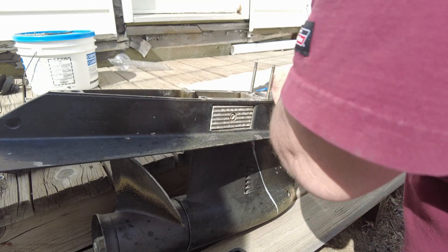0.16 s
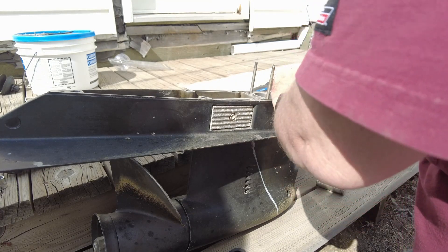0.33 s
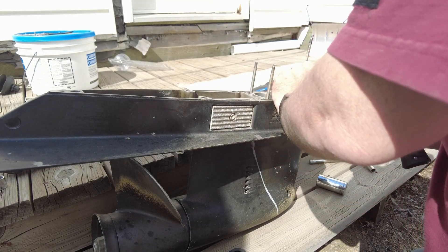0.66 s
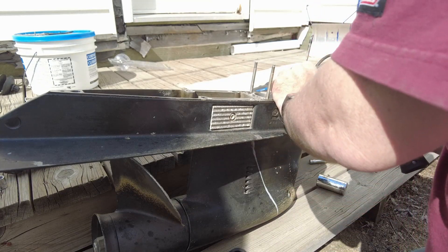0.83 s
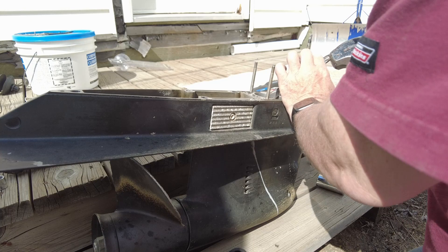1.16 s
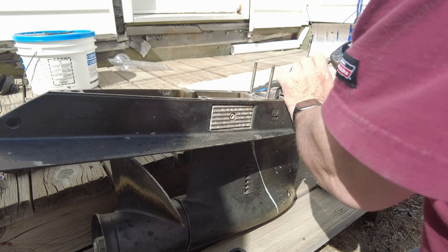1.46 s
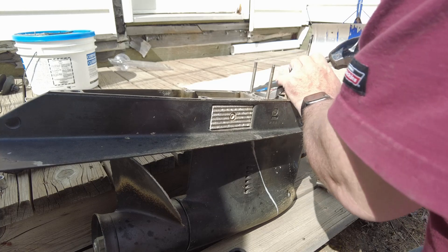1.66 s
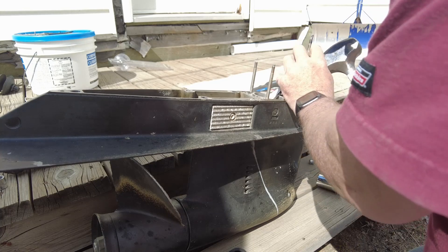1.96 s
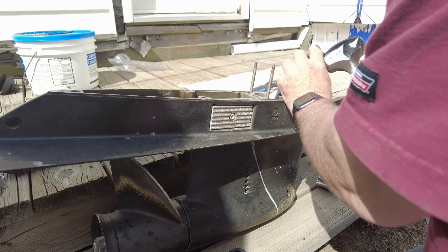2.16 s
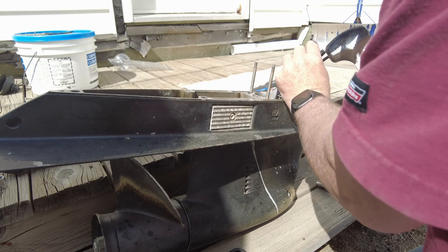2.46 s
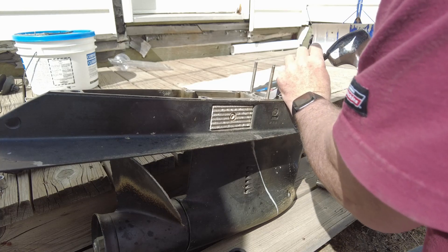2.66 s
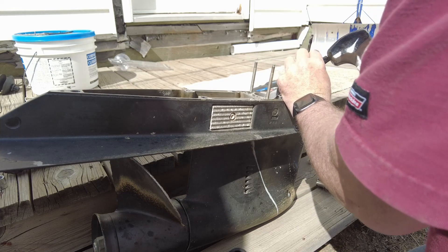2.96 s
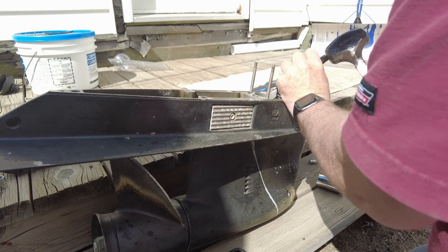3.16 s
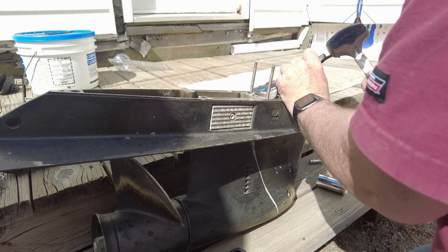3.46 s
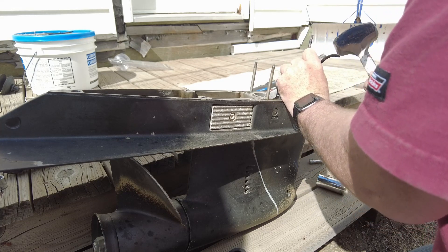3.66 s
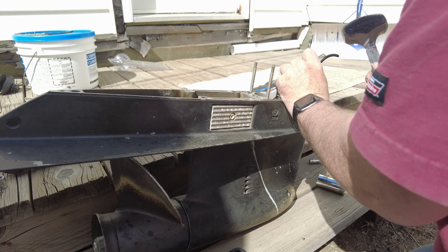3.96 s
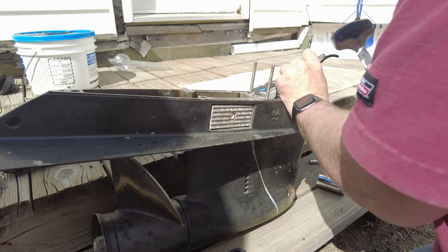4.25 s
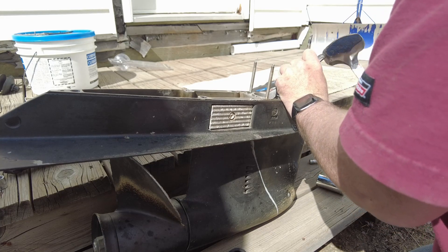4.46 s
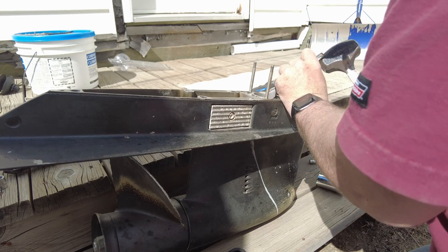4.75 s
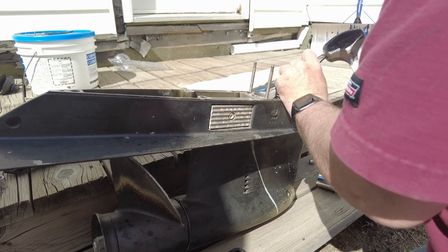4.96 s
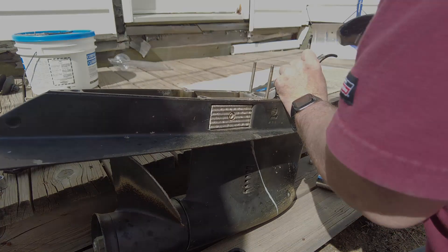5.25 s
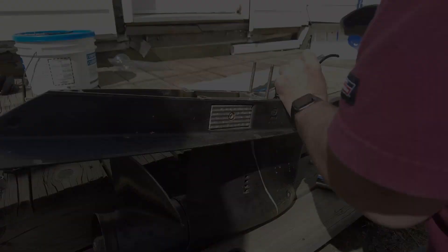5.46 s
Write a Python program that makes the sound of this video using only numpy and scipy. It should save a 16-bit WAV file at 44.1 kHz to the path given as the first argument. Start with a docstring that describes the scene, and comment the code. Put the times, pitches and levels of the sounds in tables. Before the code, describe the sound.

Close metallic hammering on a punch against a machine's metal housing, after quiet tool fumbling and wind buffeting, growing brighter and more ringing.

```python
"""Hammer and punch on a sheet-steel deck

Outdoors, a hammer drives a steel punch into a part of a machine deck, close to a mono camera microphone.
Blows are decaying modes of deck, punch and hammer plus decaying bands of noise, clipped by the recorder.
A loose piece rattles after the harder blows: short modes and a bright tick at each landing.
Around the first blows the tools are set with small taps and scrapes: clicks, mode clusters, gritty noise.
Behind lie wind rumble, a far motor's wavering drone and a distant hush, all of filtered or random signals."""
import sys
import numpy as np
from scipy import signal
from scipy.fft import rfft, irfft, next_fast_len
from scipy.io import wavfile
from scipy.ndimage import uniform_filter1d

SR = 44100
rng = np.random.default_rng(int(sys.argv[2]) if len(sys.argv) > 2 else 0)


def master(y):
    """Save y as 16-bit WAV."""
    cut = np.clip(np.atleast_2d(y).T, -1, 1)
    pcm = np.round(cut * 32767)  # scale
    wavfile.write(sys.argv[1], SR, pcm.astype(np.int16))


N = 246695

# modes of the deck's deep thud: pitch_hz, level_db, t60_s
THUD_MODES = [(160.4, -7, 0.076), (188, -11, 0.2), (268, -24.5, 0.31), (310.8, -16, 0.18),
              (364.5, -6.5, 0.17), (433.1, -5, 0.19), (455.1, -7, 0.17), (565, -14.5, 0.17),
              (740, -27, 0.06)]
# modes of the deck panel: pitch_hz, level_db, t60_s
PANEL_MODES = [(780, -14, .1), (1030, 0, .12), (1075, -6, .08), (1320, -11, .1), (1653, -3, .09),
               (1868, -18, .15), (2140, -15, .1), (2436, -15, .1)]
# clear high ring: pitch_hz, level_db, t60_s
HIGH_RING_MODES = [(1473, 0, .95), (2078, -19, .5)]


def undb(db):
    """Decibels to amplitude."""
    return 10 ** (np.asarray(db, float) / 20)


def unit(x):
    """Scale a signal to rms 1."""
    return x / np.sqrt(np.mean(x ** 2))


def add(out, s, sound):
    """Mix a short sound in at s seconds, cut at the end of the scene."""
    i = int(s * SR)
    out[i:i + len(sound)] += sound[:N - i]


def band(lo_hz, hi_hz, size=N, order=2):
    """Noise between two edges, rms 1."""
    edges_hz = [lo_hz, min(hi_hz, .45 * SR)]
    sos = signal.butter(order, edges_hz, "bandpass", fs=SR, output="sos")
    return unit(signal.sosfilt(sos, rng.standard_normal(size)))


def curve(rows, axis=1):
    """Amplitude over time from rows of start_s and a level column in dB, joined by straight lines in dB."""
    rows = np.asarray(rows)
    return undb(np.interp(np.arange(N) / SR, rows[:, 0], rows[:, axis]))


def walk(rate_hz):
    """Random values, rate_hz new ones a second, joined by straight slews; spread a little under 1."""
    k = int(SR / rate_hz)
    steps = np.repeat(rng.standard_normal(N // k + 1), k)
    return uniform_filter1d(steps, k)[:N]


def kicks(s, size):
    """Single-sample impulses at the given seconds."""
    x = np.zeros(N)
    x[(np.asarray(s) * SR).astype(int)] = size
    return x


def fade(x, t60_s):
    """Every kick starts an exponential decay."""
    return signal.lfilter([1], [1, -np.exp(-np.log(1000) / (t60_s * SR))], x)


def ring(modes, s, db, spread_db=7.0, detune=0.):
    """Strike decaying modes; every contact varies each mode's level at random, and detune its pitch."""
    chance = rng.standard_normal((len(s), len(modes), 2))
    out = np.zeros(N)
    for e in range(len(s)):
        for k, (hz, mode_db, t60_s) in enumerate(modes):
            t = np.arange(int(t60_s * SR)) / SR
            level_db = db[e] + mode_db + spread_db * chance[e, k, 0] - 60 * t / t60_s
            size = (-1) ** k * undb(level_db)  # neighbouring modes start in opposite directions
            pitch_hz = hz * (1 + detune * chance[e, k, 1])
            add(out, s[e], size * np.sin(2 * np.pi * pitch_hz * t))
    return out


def lumpy(x, peaks_db):
    """Give a noise the given uneven spectrum, rms 1."""
    size = next_fast_len(N)
    bins, knots = np.linspace(0, 1, size // 2 + 1), np.linspace(0, 1, len(peaks_db))
    gain = undb(np.interp(bins, knots, peaks_db))
    return unit(irfft(rfft(x, size) * gain, size)[:N])


def hush():
    """Distant outdoor noise in third-octave bands that waver a little, together and each alone."""
    # spectrum of the distance: pitch_hz, density_db (per Hz, relative)
    spectrum = [(60, -1), (90, 4), (140, -5.5), (220, -8.5), (450, -14.5), (1100, -17.5), (1700, -26.5),
                (2500, -26), (4000, -35), (8000, -38), (12500, -41.5), (15000, -56.5)]
    hz, db = np.transpose(spectrum)
    out, swell = 0, walk(0.34)
    for f in 63 * 2 ** np.arange(0, 8, 1 / 3):
        density_db = np.interp(np.log(f), np.log(hz), db) + 0.62 * swell + 1.0 * walk(9.6)
        # the square root of the pitch stands for the band's width
        out = out + undb(density_db) * np.sqrt(f) * band(f / 2 ** (1 / 6), f * 2 ** (1 / 6))
    return undb(-46.5) * unit(out)


def drone():
    """A far motor: a gliding tone whose two quadratures waver at random, which blurs its pitch."""
    # course of the motor: start_s, pitch_hz, level_db
    course = [(0.0, 135, -50.5), (.4, 136, -52.5), (1.1, 130.3, -44.5), (1.25, 129.6, -56.5),
              (1.4, 135.3, -45), (2.35, 133.8, -50.5), (2.5, 117.5, -40.5), (2.9, 104.3, -58),
              (3.6, 127.7, -50), (5.59, 130, -52)]
    s, hz, _ = np.transpose(course)
    turn = 2 * np.pi * np.cumsum(np.interp(np.arange(N) / SR, s, hz)) / SR
    blur_hz = 12
    tone = walk(blur_hz) * np.cos(turn) + walk(blur_hz) * np.sin(turn)
    return curve(course, axis=2) * tone


def wind():
    """Gusts on the microphone: slow pressure swings evened out in size, with a flutter above."""
    # strength of the gusts: start_s, level_db
    strength = [(0.0, -40), (0.31, -35), (0.5, -24), (0.8, -34), (1.04, -25.5), (1.15, -41), (1.47, -17),
                (1.51, -29), (1.72, -21), (1.87, -38.5), (2.08, -35), (2.25, -37), (2.28, -29), (2.41, -42),
                (2.56, -33.5), (2.85, -38.5), (3.0, -41)]
    swing_top_hz, flutter_db = 24, -13
    swings = band(9, swing_top_hz)
    power = uniform_filter1d(swings ** 2, 2600)
    swings = unit(swings / np.sqrt(power + 0.12))
    return curve(strength) * (swings + undb(flutter_db) * band(swing_top_hz, 51))


def taps():
    """Tools touching the deck: a broad click, one tight cluster of modes, and a soft answer of the deck."""
    # contacts: start_s, click_db, ping_db, ping_hz, thud_db, high_ring_db
    contacts = [(0.701, -50.5, -78, 3770, -45, -67), (1.485, -50.5, -64, 3880, -44, -69),
                (1.898, -56.5, -65.5, 6230, -40.5, -64.5), (1.971, -71, -36, 1570, -36, -70),
                (1.99, -59, -53, 9200, -53, -77), (2.016, -34, -32, 6300, -35, -54),
                (2.029, -20.5, -29, 5270, -44, -46.5), (2.39, -36.5, -46, 3216, -39, -51.5),
                (2.541, -33.5, -25, 2165, -43.5, -84.5), (2.694, -41.5, -36, 1400, -36.5, -59),
                (2.74, -49, -54, 1094, -52, -70), (3.032, -52, -49, 1705, -35.5, -65),
                (3.233, -63.5, -51.5, 997, -38.5, -64.5), (3.965, -58, -69.5, 6000, -56.5, -83),
                (4.15, -56, -58.5, 3500, -50.5, -74.5), (4.482, -46.5, -57, 3500, -53, -86)]
    s, click_db, ping_db, ping_hz, thud_db, ring_db = np.transpose(contacts)
    out = ring(THUD_MODES, s, thud_db) + ring(PANEL_MODES, s, thud_db - 9)
    out += ring(HIGH_RING_MODES, s, ring_db, spread_db=1.)
    click_hz, click_t60_s, ping_t60_s = 3300, .045, .06
    size = 8192
    fall_db = -60 * np.arange(size) / SR / click_t60_s
    for e in range(len(s)):
        click = band(click_hz / 1.03, click_hz * 1.16, size=size)
        click += undb(2.5) * band(550, 4700, size=size, order=3)
        add(out, s[e], undb(click_db[e] + fall_db) * click)
        cluster = [(ping_hz[e] * ratio, 0, ping_t60_s) for ratio in (.985, 1, 1.02)]
        out += ring(cluster, [s[e]], [ping_db[e]], detune=.004)
    return out


def scrape():
    """The punch dragged over the deck: its tip sticks and slips, and the grit shakes deck and panel."""
    # drags: start_s, length_s, groan_db, grit_db
    drags = [(1.906, 0.076, -33.5, -50.5), (1.989, 0.041, -61, -35.5), (2.032, 0.079, -63, -46),
             (2.667, 0.032, -48.5, -42.5), (3.077, 0.44, -53, -62.5)]
    catches_per_s, catch_spread_db, catch_t60_s, edge_s = 220, 2.5, .07, 0.016
    slips = (rng.random(N) < catches_per_s / SR) * undb(catch_spread_db * rng.standard_normal(N))
    grit = unit(fade(slips, catch_t60_s))
    groan = band(340, 470)
    rasp = band(550, 1200) + band(1300, 2800)
    t = np.arange(N) / SR
    out = np.zeros(N)
    for start, length, groan_db, grit_db in drags:
        inside_s = np.minimum(t - start, start + length - t)
        contact = np.clip(inside_s / edge_s + .5, 0, 1) ** 2
        out += contact * grit * (undb(groan_db) * groan + undb(grit_db) * rasp)
    return out


def rattle():
    """A small free piece: a bright tick and short modes, a little different at each landing."""
    # the loose piece landing again: start_s, level_db
    landings = [(4.2215, -25), (4.2644, -44), (4.5652, -13.5), (4.6066, -20.5), (4.8548, -15.5),
                (4.9098, -19.5), (4.9354, -27), (4.9594, -29), (5.1884, -12.5), (5.23, -25.5), (5.432, -16),
                (5.5198, -13), (5.5578, -27)]
    # modes of the loose piece: pitch_hz, level_db, t60_s
    loose_modes = [(1350, -10, .04), (3300, -3, .035), (3550, -4, .03), (6000, -4, .025), (6300, -4, .025),
                   (7250, -3, .035), (9900, -10, .03), (11600, -8, .035)]
    s, db = np.transpose(landings)
    tick = undb(-19) * fade(kicks(s, undb(db)), .035) * band(2800, 12000)
    return ring(loose_modes, s, db - 16, spread_db=3., detune=.015) + tick


def sway(s, force_db):
    """The stand under the deck swings a moment after each blow: a few very low cycles swell and die."""
    sway_hz, sway_db, delay_s, width_s = 35, -23, .112, .03
    t = np.arange(N) / SR - np.asarray(s)[:, None] - delay_s
    swing = np.exp(-(t / width_s) ** 2) * np.cos(2 * np.pi * sway_hz * t)
    return -undb(force_db + sway_db) @ swing


def clear_rings(s, force_db, seating_db, high_db):
    """A few longer clear modes; the low ones grow with the seating of the punch."""
    # low rings: pitch_hz, level_db, t60_s
    low_ring_modes = [(393, 1, .3), (895, -2, .45), (921.5, 0, .55), (1153, 1, .32)]
    low_db = force_db - 5 + 1.24 * seating_db
    return ring(low_ring_modes, s, low_db, spread_db=1.) + ring(HIGH_RING_MODES, s, high_db, spread_db=1.)


def punch_and_face(s, punch_db, crack_db, chatter_db):
    """Short bright modes of punch and hammer face, each made uneven by the jarring of the contact."""
    # modes of the punch: pitch_hz, level_db, t60_s
    punch_modes = [(2423, -1.5, 0.043), (3057, -6, 0.12), (3370, 2, 0.062), (4010, -1.5, 0.049),
                   (4115, -2.5, 0.1), (4510, -4, 0.04), (5800, -21.5, 0.062), (7620, -11.5, 0.1),
                   (9940, -17, 0.088), (10900, -16, 0.042)]
    # modes of the hammer face: pitch_hz, level_db, t60_s
    face_modes = [(6237, 9.4, 0.032), (6490, 3.3, 0.037), (6720, 1.3, 0.017)]
    out = np.zeros(N)
    for modes, db in ((punch_modes, punch_db), (face_modes, crack_db - 9)):
        for mode in modes:
            jar = undb(chatter_db + 4 * walk(300))
            out += ring([mode], s, db, spread_db=2.5, detune=.012) * jar
    return out


def sheet(s, crack_db, tail_db, chatter_db):
    """Dense sheet modes, too close to tell apart: noise bands with a quick crack and a slower tail."""
    # bands of the sheet: pitch_hz, crack_db, crack_t60_s, tail_db, tail_t60_s
    sheet_bands = [(109, -28, 0.083, -29.5, 0.55), (322, -1, 0.012, -16, 0.35),
                   (630, -14.5, 0.099, -19, 0.28), (1170, -19.5, 0.021, -15.5, 0.11),
                   (3160, -1.5, 0.017, -30, 0.42), (4230, -5.5, 0.087, -28.5, 0.27),
                   (7000, -2.5, 0.02, -24.5, 0.068), (9400, -14, 0.051, -38.5, .1),
                   (15400, -10, 0.019, -28, 0.027)]
    crack, tail = kicks(s, undb(crack_db)), kicks(s, undb(tail_db))
    # the dense modes still leave peaks and dips of this depth and width
    peak_db, peak_hz = 6, 45
    peaks_db = peak_db * rng.standard_normal(int(SR / 2 / peak_hz))
    out = np.zeros(N)
    for hz, quick_db, quick_t60_s, slow_db, slow_t60_s in sheet_bands:
        swell = undb(quick_db) * fade(crack, quick_t60_s) + undb(slow_db) * fade(tail, slow_t60_s)
        jar = undb(chatter_db + 3.75 * walk(90))
        out += swell * jar * lumpy(band(hz / 1.554, hz * 1.46), peaks_db)
    return out


def hammer():
    """Blows and rebounds: a firmly seated punch passes the blow into the deck and rings less itself."""
    # hammer blows: start_s, force_db, crack_db, seating_db (of the punch), high_ring_db
    blows = [(.828, -11.5, -16, -16, -53), (3.809, -6.5, -5, -23, -36.5), (4.158, -1, -7.5, -12.5, -37.5),
             (4.497, 0, -7, -10, -24), (4.772, -3, -2.5, -2.5, -18), (5.063, -3.5, -2.5, -2.5, -16.5),
             (5.354, -3.5, -0.5, -3, -10.5)]
    # the hammer bouncing back onto the punch: start_s, force_db
    rebounds = [(5.086, -11.5), (5.38, -12.5)]
    s, force_db, crack_db, seating_db, high_db = np.transpose(blows)
    out = clear_rings(s, force_db, seating_db, high_db) + sway(s, force_db)
    # from here on the rebounds strike too
    again_s, again_db = np.transpose(rebounds)
    s, force_db = np.r_[s, again_s], np.r_[force_db, again_db]
    crack_db = np.r_[crack_db, again_db - 2]
    seating_db = np.r_[seating_db, np.full(len(again_s), -6.5)]
    # each part: level over the force, then dB per dB of seating
    tail_db = force_db + 3.75 + 0.54 * seating_db
    panel_db = force_db + 5.96 + 1.11 * seating_db
    punch_db = force_db - 16 - 0.53 * seating_db
    out += ring(THUD_MODES, s, force_db, spread_db=2., detune=.006)
    out += ring(PANEL_MODES, s, panel_db, spread_db=2., detune=.006)
    chatter_db = 1.62 * walk(220)  # punch and part jar against each other while they ring
    out += punch_and_face(s, punch_db, crack_db, chatter_db)
    return out + sheet(s, crack_db, tail_db, chatter_db)


def scene():
    """All sources at the one microphone, the same in both channels."""
    background = hush() + drone() + wind()
    tools = taps() + scrape() + rattle() + hammer()
    return np.tile(background + tools, (2, 1))


def record(dry):
    """The converter clips the blows flat; a steep low-pass then cuts the top."""
    top_hz = 15760
    clipped = np.clip(dry, -1, 1)
    low_pass = signal.ellip(6, .2, 28, top_hz, fs=SR, output="sos")
    return np.clip(signal.sosfilt(low_pass, clipped), -1, 1)


dry = scene()
out = record(dry)
master(out)
```